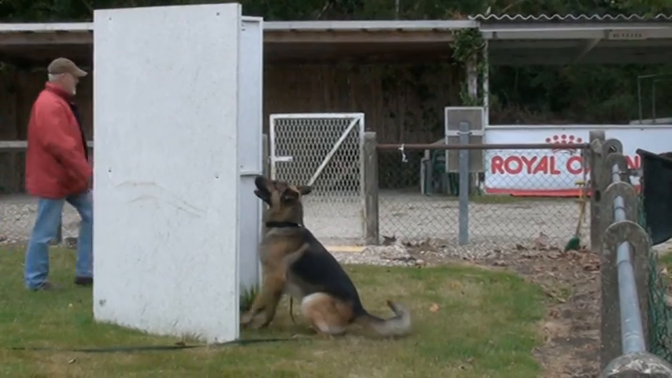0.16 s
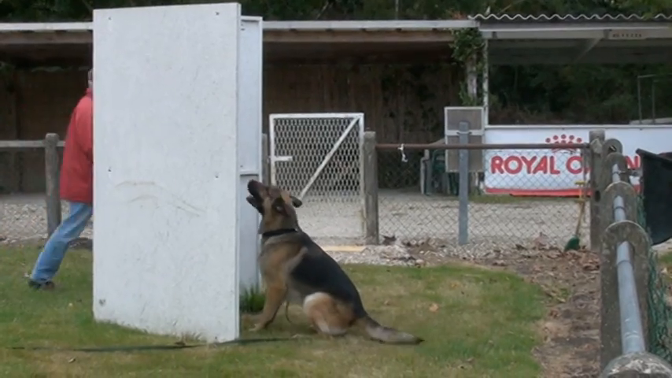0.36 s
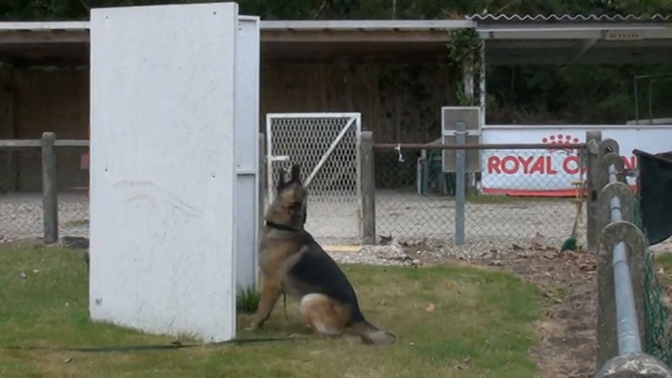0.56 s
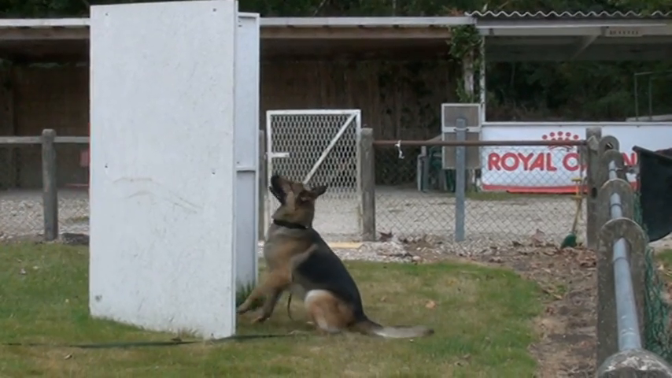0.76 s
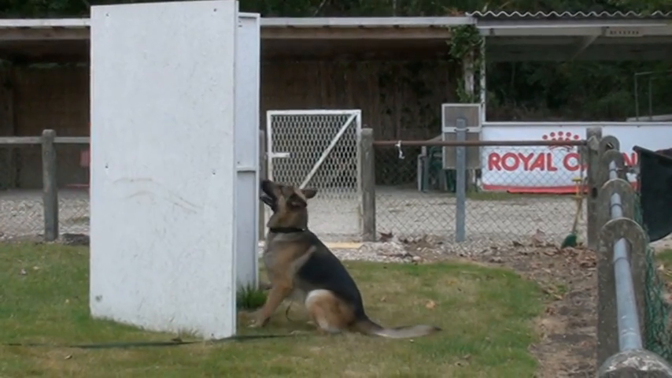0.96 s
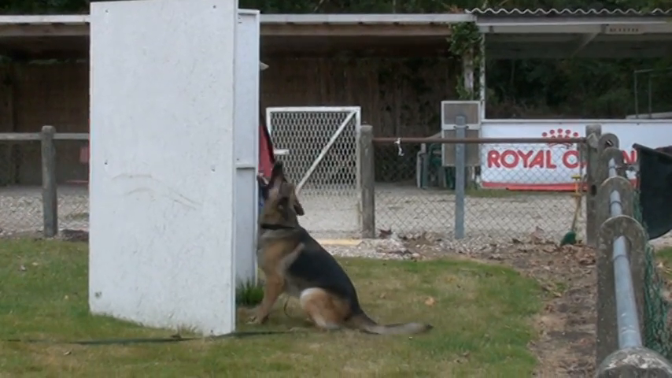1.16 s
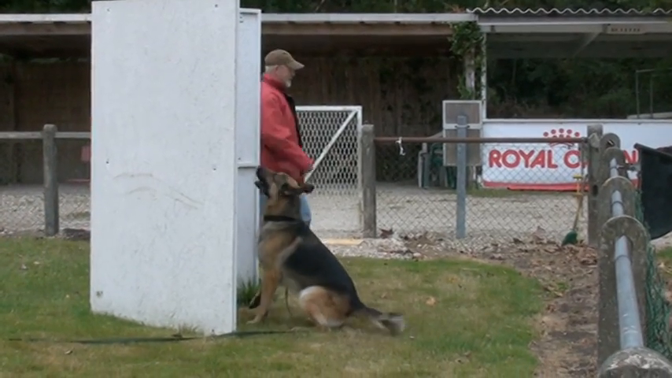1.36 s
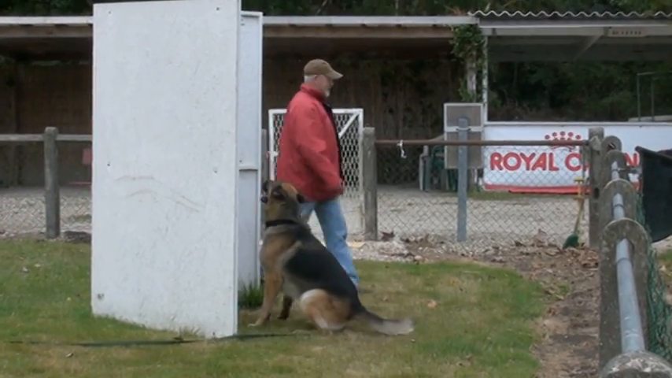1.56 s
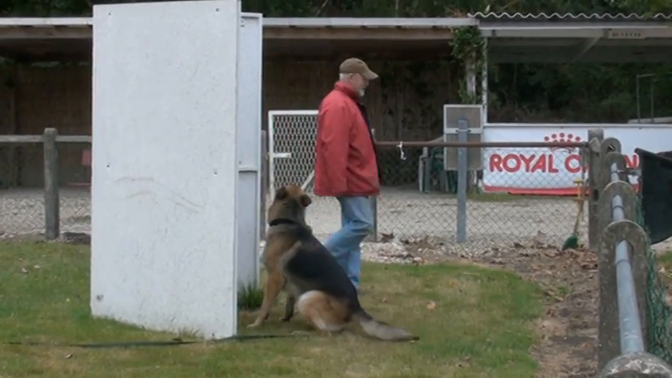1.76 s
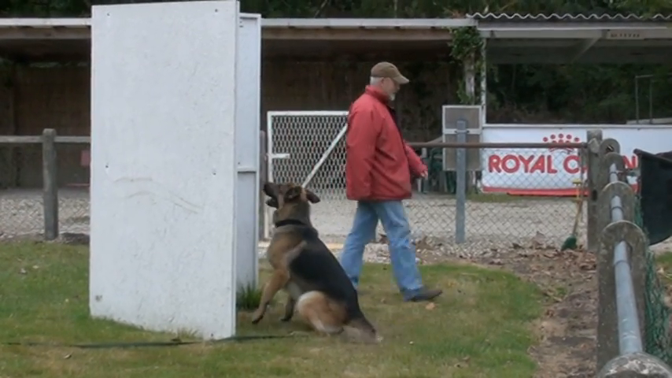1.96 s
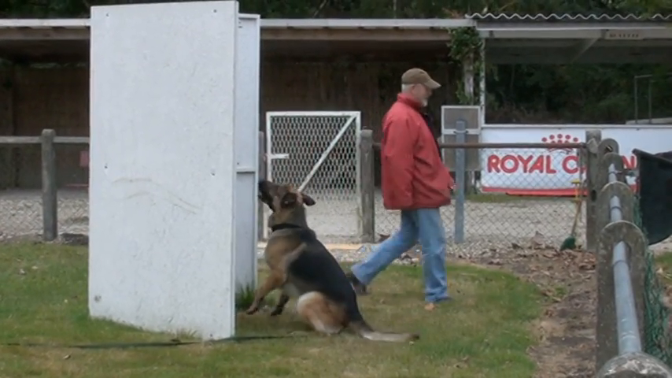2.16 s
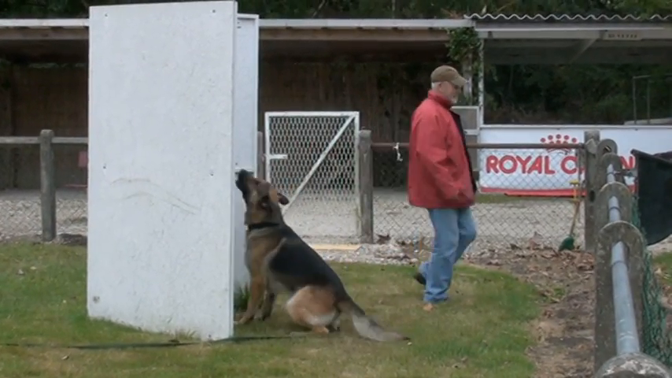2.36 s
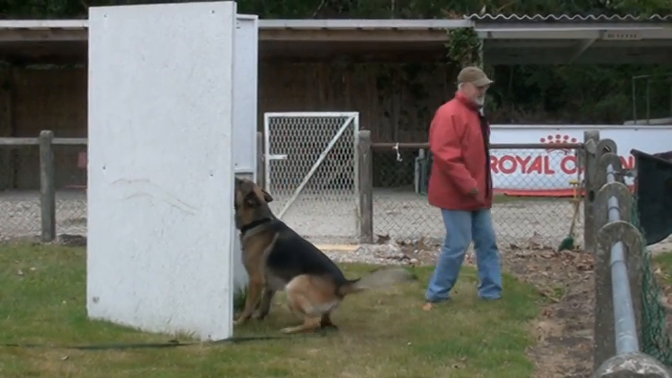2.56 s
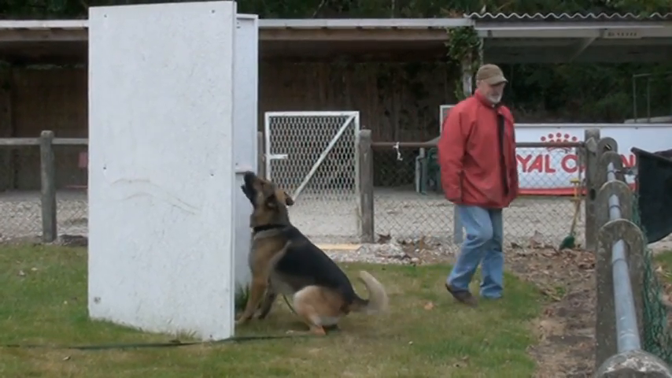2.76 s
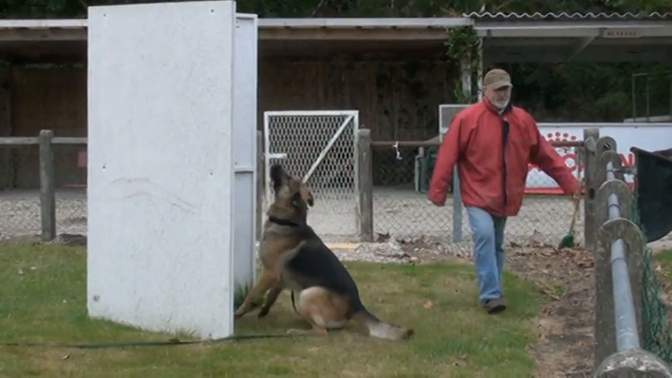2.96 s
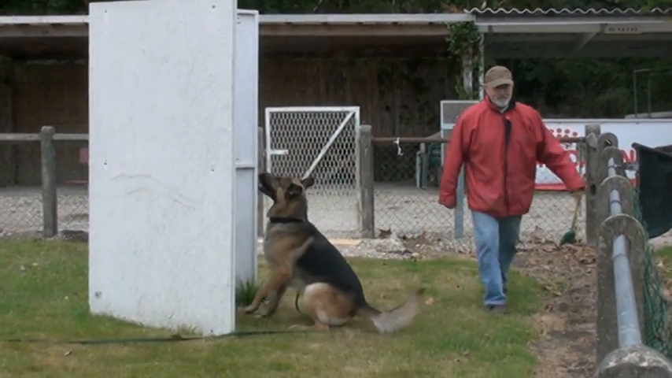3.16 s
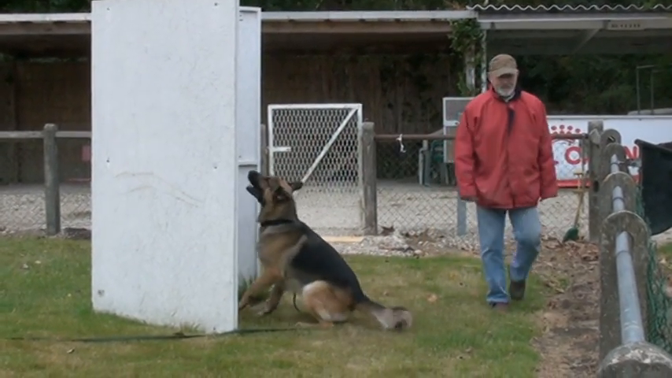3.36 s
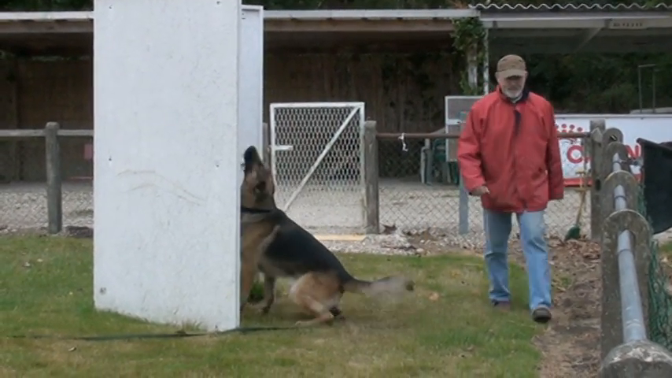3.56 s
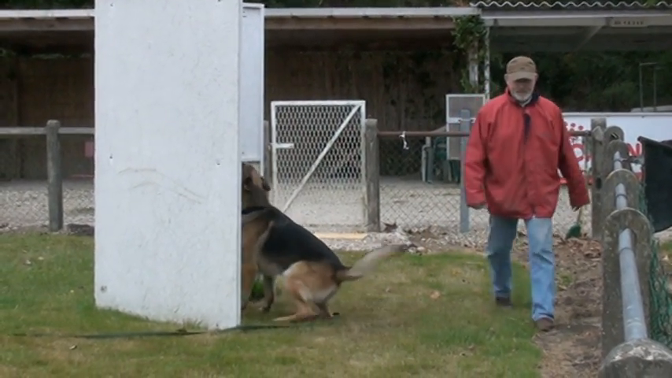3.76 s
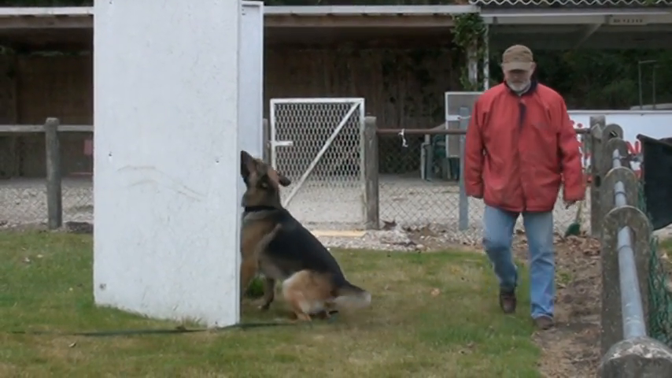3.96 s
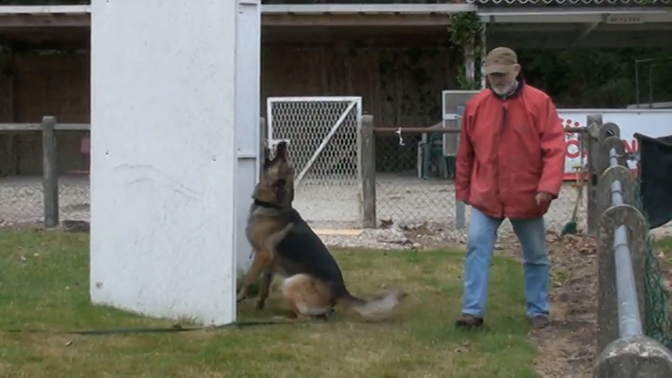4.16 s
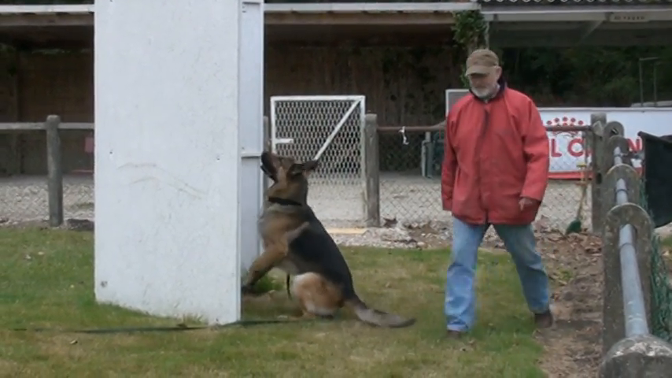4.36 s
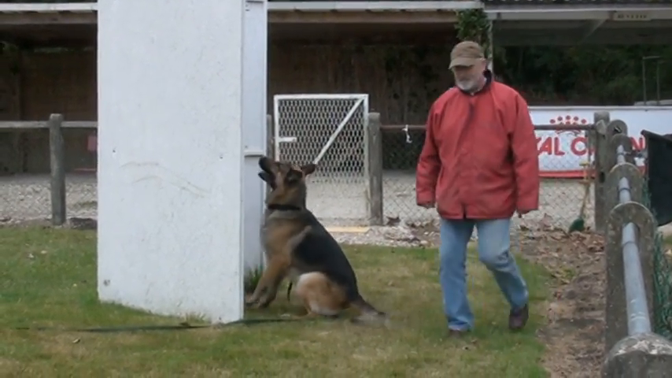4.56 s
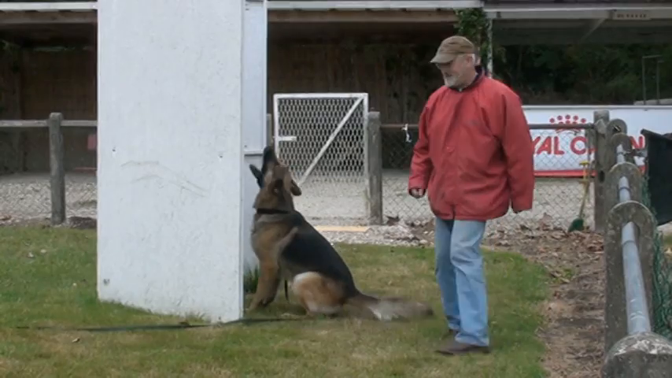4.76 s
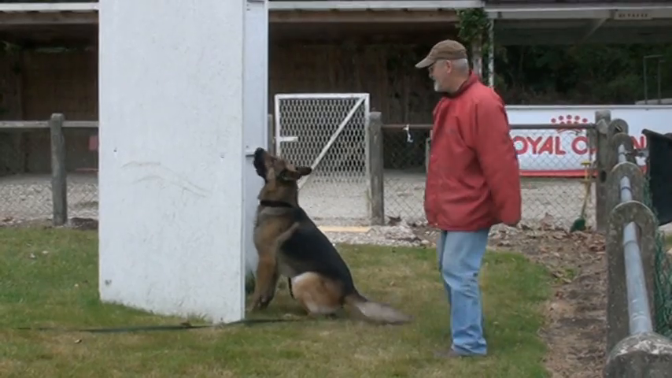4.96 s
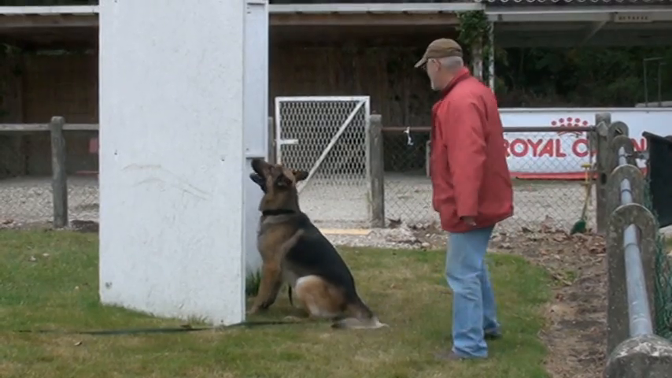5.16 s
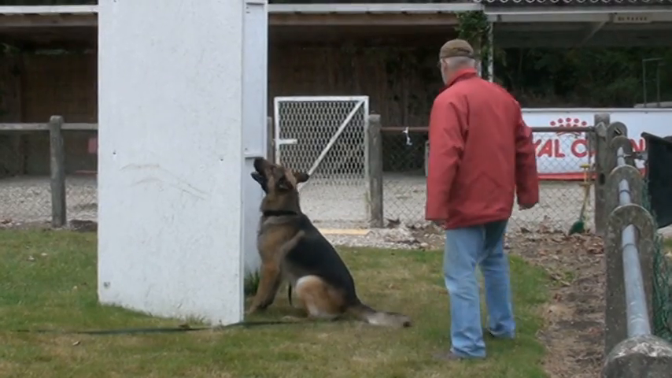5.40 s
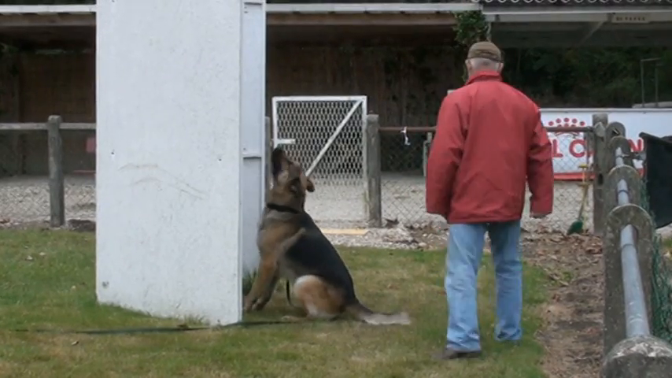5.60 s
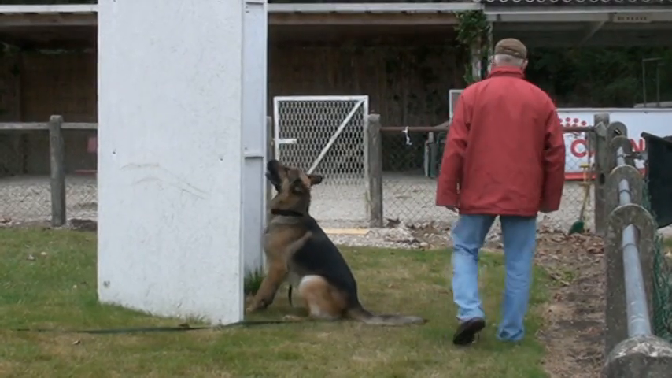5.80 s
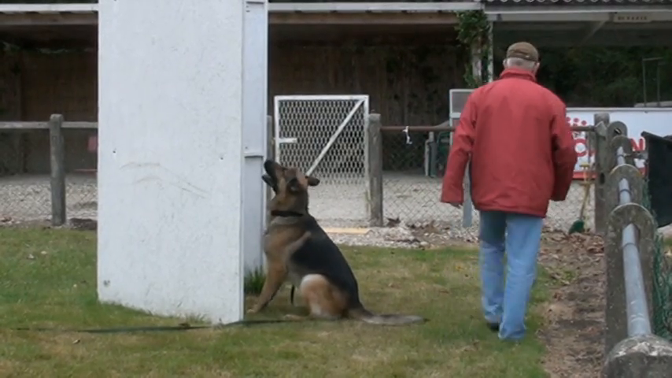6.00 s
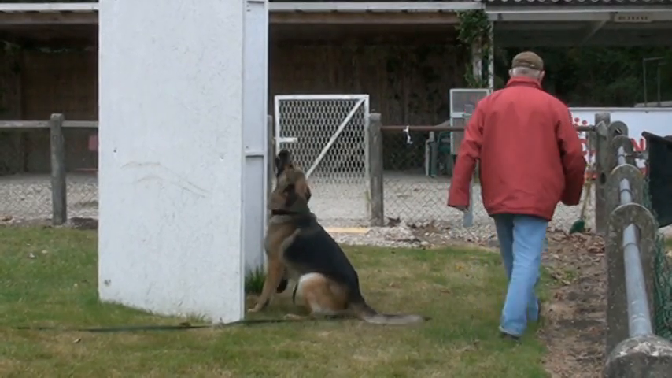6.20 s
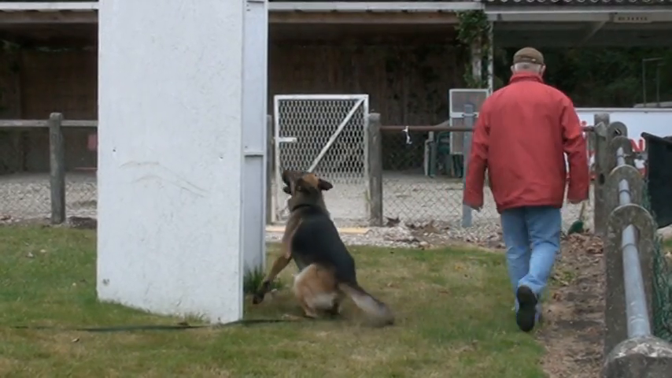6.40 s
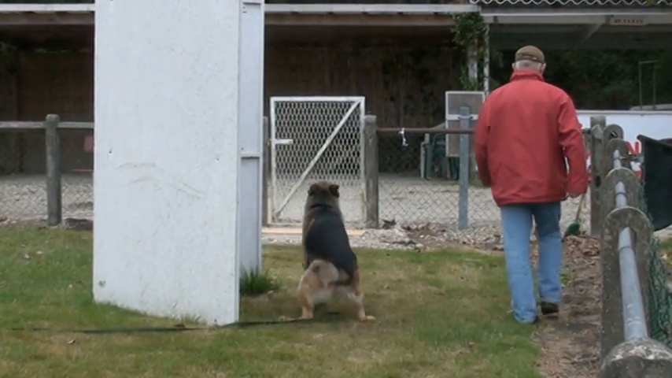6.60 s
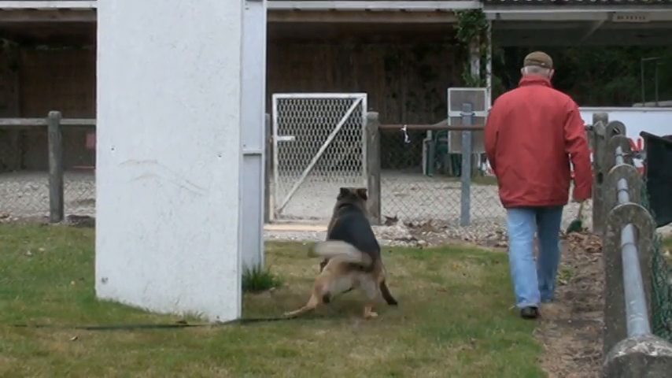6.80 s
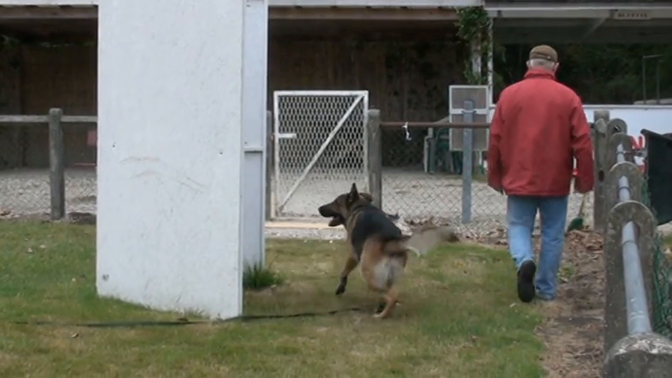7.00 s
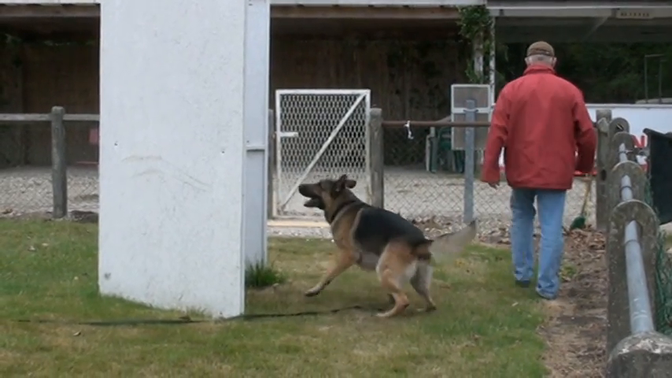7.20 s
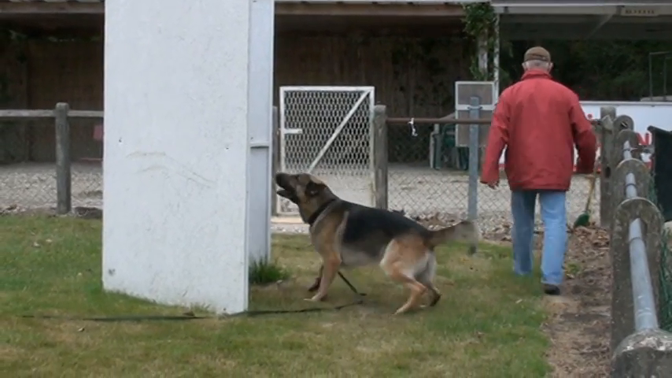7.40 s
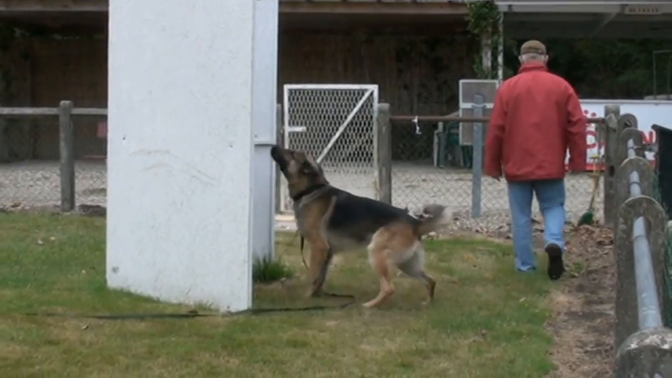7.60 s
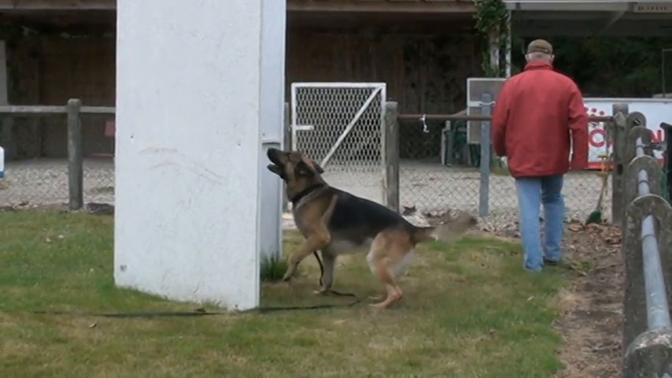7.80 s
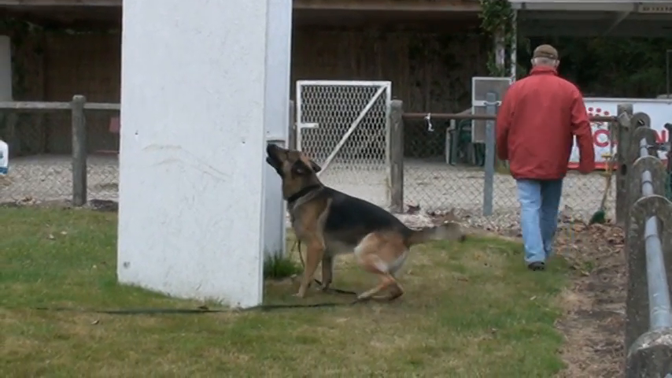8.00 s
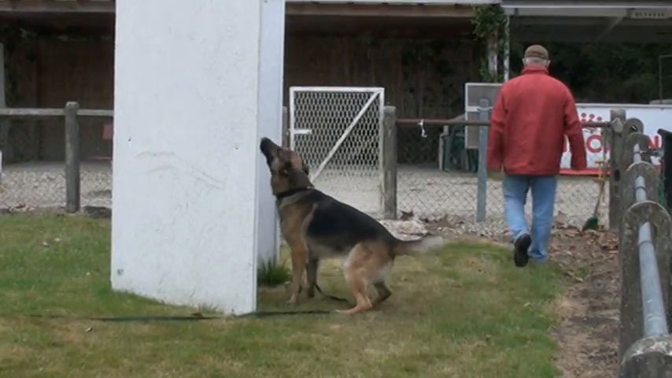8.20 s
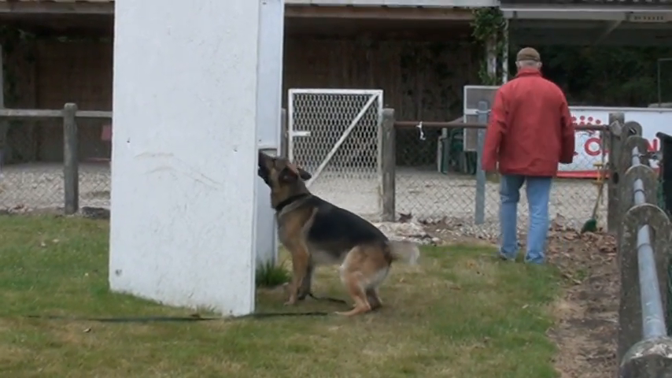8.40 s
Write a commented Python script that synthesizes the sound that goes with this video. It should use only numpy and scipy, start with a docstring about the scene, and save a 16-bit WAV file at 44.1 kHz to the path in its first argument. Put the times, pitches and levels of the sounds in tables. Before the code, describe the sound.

Outdoor field: a big dog barks steadily, short hoarse single barks echoing off nearby sheds, with faint rustles, ticks and a soft far-off traffic wash.

```python
"""On a grass field between sheds, a large dog barks twelve times some metres from a two-port microphone.
Each bark is a stack of vocal-fold partials through jaw, chest, mouth and muzzle resonances, with breath noise.
Sinking notes close the barks; soft puffs are filtered noise. Walls and sheds return echoes and a diffuse tail.
Clicks of noise tick, cloth and grass rustle as swelling hiss, and traffic washes far off.
Below lie steady low air, a far drone and a thin electronic whine."""
import sys
import numpy as np
from scipy import signal
from scipy.fft import rfft, irfft, next_fast_len
from scipy.io import wavfile
from scipy.ndimage import uniform_filter1d, minimum_filter1d

SR = 44100
rng = np.random.default_rng(int(sys.argv[2]) if len(sys.argv) > 2 else 0)


def log_audio(samples):
    """Write samples as a 16-bit WAV file to the path given in sys.argv[1]."""
    # one column per channel
    frames = np.atleast_2d(samples).T
    # limit to full scale, then quantise
    limited = np.clip(frames, -1, 1)
    pcm = np.round(limited * 32767).astype(np.int16)
    wavfile.write(sys.argv[1], SR, pcm)


N = 372644  # length in samples
LEAD = SR // 5  # samples ahead of time zero: the first bark begins there


def gain_of(db):
    """Turns decibels into an amplitude factor."""
    return 10 ** (np.asarray(db) / 20)


def evened(x):
    """Scales a sound to an rms of one, over all its channels together."""
    return x / np.sqrt(np.mean(x ** 2) + 1e-20)


def read(points, hz):
    """Reads a curve of (Hz, value) points along a logarithmic frequency axis."""
    point_hz, value = np.transpose(points)
    return np.interp(np.log(hz + 1), np.log(point_hz + 1), value)


def curve(rows, t):
    """Draws straight lines in time through each column that follows the seconds."""
    seconds, *columns = np.transpose(rows)
    return [np.interp(t, seconds, column) for column in columns]


def add(mix, start_s, sound):
    """Lays a sound into the mix at its start time, cut at the end of the mix."""
    part = mix[round(start_s * SR):][:len(sound)]
    part += sound[:len(part)]


def resonate(x, hz, width_hz):
    """Shifts the curve hz down to zero, smooths twice, and shifts back: a steep resonance."""
    turn = np.exp(2j * np.pi * np.cumsum(hz * np.ones(len(x))) / SR)
    decay = np.exp(-np.pi * width_hz / SR)
    once = signal.lfilter([1 - decay], [1, -decay], x / turn + 1e-18)
    twice = signal.lfilter([1 - decay], [1, -decay], once)
    return 2 * (turn * twice).real


def wobble(length, hz):
    """Low-passes noise at hz, so that it mostly changes more slowly than that."""
    settle = 999  # samples dropped while the filter starts up
    noise = rng.standard_normal(length + settle)
    return evened(signal.lfilter(*signal.butter(2, hz, fs=SR), noise)[settle:])


def hiss(colour_db, patchy_db):
    """Two-channel noise from random short-time spectra; faint patches drift over the colour."""
    # Each row: frequency in Hz, likeness of the left and right port from 0 to 1.
    likeness = [(30, .98), (60, .97), (125, .83), (500, .82), (1500, .73), (4000, .83), (9000, .77),
                (11500, .93), (13500, .99)]
    frames, hz = N // 256 + 5, np.fft.rfftfreq(1024, 1 / SR)
    left_re, left_im, other_re, other_im, patches = rng.standard_normal((frames, 513, 5)).T
    patches = uniform_filter1d(patches, size=12, axis=0)  # across frequency
    patches = evened(uniform_filter1d(patches, size=14, axis=1))  # along time
    same = np.clip(read(likeness, hz), -1, 1)[:, None]
    left = left_re + 1j * left_im
    right = same * left + np.sqrt(1 - same ** 2) * (other_re + 1j * other_im)
    spectra = np.array([left, right])
    spectra *= gain_of(read(colour_db, hz)[:, None] + patchy_db * patches)
    return evened(signal.istft(spectra, nperseg=1024, noverlap=768)[1][:, :N])


def dog():
    """Barks, closing gulps and soft puffs reach the ports directly and by way of the field."""
    # One list a bark. Each row: time in seconds, effort in dB, pitch in Hz, jaw resonance in Hz.
    bark_curves = [
        [(-0.085, -34, 288, 583), (-0.065, -11.5, 285.7, 568.4), (-0.045, -18.5, 347.4, 688),
         (-0.017, -16, 356, 678), (-0.01, -19, 233.3, 470), (0.003, -23.5, 226, 438), (0.015, -19, 214, 424)],
        [(0.57, -33, 348, 700), (0.586, -20.5, 400.6, 806), (0.591, -19, 315, 659), (0.61, -15, 345.7, 649),
         (0.635, -17, 352.2, 702), (0.648, -18.5, 319, 584), (0.66, -21, 232.4, 437), (0.672, -17.5, 212, 426),
         (0.682, -56.5, 210, 420)],
        [(1.178, -50, 283.4, 640), (1.2, -27, 280.6, 600), (1.225, -13.5, 289.4, 596), (1.236, -18, 281, 574),
         (1.244, -18, 351, 705), (1.275, -17.5, 352.7, 707), (1.29, -20.5, 315.7, 516.7),
         (1.306, -27.5, 295, 400)],
        [(2.286, -47, 247.4, 633), (2.295, -25, 248, 706), (2.305, -30.5, 266.7, 709.3),
         (2.312, -15, 304.6, 650), (2.33, -18.5, 327.3, 628), (2.352, -18, 355.5, 610),
         (2.372, -16.5, 340.8, 538), (2.39, -25.5, 333, 480), (2.402, -33, 332, 430)],
        [(2.91, -39, 323.5, 616), (2.93, -26.5, 408.2, 786), (2.936, -19.5, 290.5, 639),
         (2.955, -14.5, 324, 559), (2.97, -15, 345.8, 664), (2.992, -18.5, 338.4, 487),
         (3.003, -16.5, 247.7, 441), (3.022, -33, 229, 410)],
        [(3.567, -50, 300, 628), (3.575, -24.5, 295.8, 620), (3.592, -17, 286.2, 632),
         (3.606, -15.5, 260.2, 533), (3.634, -17, 232.4, 481), (3.642, -32, 206, 447), (3.665, -29, 187, 366)],
        [(4.181, -38.5, 298.6, 609), (4.199, -27, 429.3, 860), (4.204, -17.5, 295, 650),
         (4.218, -17, 296.3, 599), (4.228, -18, 345, 724), (4.256, -17.5, 347.7, 721), (4.263, -17, 233.7, 466),
         (4.276, -19.5, 234, 455), (4.288, -36, 210, 417)],
        [(4.848, -60, 284, 593), (4.858, -28, 285.7, 606), (4.882, -17, 287.6, 606), (4.89, -18.5, 341, 655),
         (4.91, -15.5, 351.5, 666), (4.932, -20.5, 334, 465), (4.942, -32.5, 342, 423), (4.968, -40, 315, 335)],
        [(5.478, -46, 240.7, 570), (5.505, -37, 240.5, 622), (5.518, -24, 259.8, 624), (5.535, -29, 293.6, 618),
         (5.543, -15.5, 336, 624), (5.58, -17.5, 363.6, 722), (5.6, -18, 350, 702), (5.622, -21.5, 308.3, 530),
         (5.644, -40, 274, 584)],
        [(6.108, -47, 292.8, 686), (6.14, -38.5, 279.3, 693), (6.158, -27.5, 289.7, 702),
         (6.178, -16, 299.4, 628), (6.193, -20.5, 317, 626), (6.203, -15.5, 357.4, 733),
         (6.222, -18.5, 362.4, 736), (6.242, -19, 347.4, 690), (6.262, -18, 290.5, 538), (6.286, -51, 246, 500)],
        [(7.524, -45, 334, 485), (7.538, -22.5, 340.6, 706), (7.55, -18, 294.4, 688), (7.575, -16.5, 341, 653),
         (7.605, -17, 352, 717), (7.628, -21.5, 319.3, 528), (7.642, -37, 310, 630)],
        [(8.112, -58, 244.3, 595), (8.129, -36, 238.4, 584), (8.136, -24.5, 249, 530), (8.15, -29, 283, 545),
         (8.162, -19, 334.4, 630), (8.18, -15, 350, 647), (8.195, -16, 365.5, 700), (8.213, -22, 370.4, 694),
         (8.235, -21, 348, 640), (8.248, -22, 330, 540), (8.26, -49.5, 318, 606)],
    ]
    # Each row, one a bark: starting roughness at full effort from 0 to 1, mouth resonance in dB at start
    # and at end, muzzle brightness in dB at start and at end (mouth and muzzle for a jaw at rest, muzzle
    # at full effort), chest resonance in dB at the end, rasp of air in dB halfway at full effort,
    # closing tone in dB, gulp in dB.
    bark_timbres = [(0.12, 1.5, 4, -2, -3.5, 0.5, 7, -4, -41.5),
                    (0.2, -2, 7.5, -8, -4.5, -13, -1, -0.5, -42.5),
                    (0.07, -0.5, 3.5, -3, -3.5, -6.5, 4, -13, -43),
                    (0.09, -4, 4, -10.5, -8, -6.5, 2, -9.5, -47),
                    (0.16, -8, 12.5, -8.5, -4, -13, 0.5, 1.5, -50),
                    (.08, 2.5, -11, -9, -10.5, 1.5, 4, -6, -43.5),
                    (0.18, -4.5, 3.5, -9.5, -3, -8.5, 3.5, 0, -41),
                    (.12, -0.5, 5.5, -5, -8, -4.5, 3.5, -12.5, -43),
                    (0.18, -3.5, -3, -13, -5, -12.5, 1.5, -11, -50),
                    (0.06, -6.5, 2.5, -5.5, -8.5, -10, 1, -16, -55),
                    (0.12, 2, -2, -18.5, -3.5, -1.5, 3.5, -11, -53),
                    (0.14, 6, -0.5, -4.5, -8, 5.5, 2, -20, -53)]
    mix, lead_s = np.zeros(next_fast_len(N + LEAD)), LEAD / SR
    for rows, (*timbre, gulp_db) in zip(bark_curves, bark_timbres):
        start_s, end_s = rows[0][0], rows[-1][0]
        add(mix, start_s + lead_s, bark(rows, *timbre))
        add(mix, end_s - .012 + lead_s, gulp(gulp_db))
    soft_puffs(mix)
    return (ports(mix) + field(mix))[:, LEAD:LEAD + N]


def bark(rows, rough, mouth_db, mouth_end_db, bright_db, bright_end_db, chest_db, rasp_db, tone_db):
    """Vocal-fold partials, shaken by chance as roughness grows, pass jaw, chest, mouth and muzzle."""
    # A broad and a sharp part of the jaw resonance. Each row: smoothing width in Hz, level in dB.
    jaw_parts = [(278, -4.5), (108.5, -3.5)]
    # Muzzle resonances. Each row: frequency in Hz, smoothing width in Hz, relative level in dB.
    muzzle_modes = [(1468, 332, -2), (1802, 300, -4.5), (2026, 550, -17.5), (2540, 620, -26.5)]
    # Air past the teeth. Each row: frequency in Hz, smoothing width in Hz, relative level in dB.
    breath_bands = [(3130, 1670, -43), (4380, 2440, -39), (5770, 1700, -41), (7550, 2000, -47),
                    (9700, 3900, -49.5)]
    jaw_rest_hz, shut_hz = 658, 151  # shut_hz: sink below rest at which the closing tone is full
    t = np.arange(rows[0][0], rows[-1][0], 1 / SR)
    effort_db, hz, jaw_hz = curve(rows, t)
    done = np.linspace(0, 1, len(t))
    weak_db = np.maximum(-16 - effort_db, 0)  # how far below full effort
    open_hz = jaw_hz - jaw_rest_hz

    # weak and tiring folds vibrate unevenly
    rough = np.clip(rough + .018 * weak_db + .22 * done ** 4.0, 0, 1)
    # a wide jaw rings brighter; a weak push dulls the muzzle
    mouth_db = mouth_db + (mouth_end_db - mouth_db) * done + .03 * open_hz
    bright_db = bright_db + (bright_end_db - bright_db) * done + .02 * open_hz - 0.35 * weak_db
    # chest and rasp grow through each bark
    chest_db = chest_db - 21.5 * (1 - done)
    rasp_db = rasp_db - 8.5 * (.5 - done)

    turns = np.cumsum(hz * (1 + 0.054 * rough * wobble(len(t), 91))) / SR
    shared, drive = wobble(len(t), 210), 0
    for k in range(1, 10):
        shake = 0.23 * shared + 1.39 * wobble(len(t), 206)  # uneven cycles fill the gaps between the lines
        spread = 0.348 * k * k  # a drawn-out closing of the folds staggers the partials
        broken = np.clip(rough * (0.72 + 0.089 * k), 0, .98)  # high partials break up first
        strength = np.sqrt(1 - broken ** 2) + 1.84 * broken * shake
        drive = drive + strength * np.cos(2 * np.pi * k * turns - spread)

    voice = sum(gain_of(db) * resonate(drive, jaw_hz, width) for width, db in jaw_parts)
    voice -= gain_of(chest_db) * resonate(drive, hz=317.3, width_hz=67)
    mouth_hz = 1000 + 0.11 * open_hz  # sinks as the jaw closes
    voice -= gain_of(mouth_db) * resonate(drive, mouth_hz, width_hz=238)
    muzzle = 0
    for k, (mode_hz, width, db) in enumerate(muzzle_modes):
        muzzle = muzzle + (-1) ** k * gain_of(db) * resonate(drive, mode_hz, width)
    voice += gain_of(bright_db) * muzzle

    # the jaw sings a tone of its own as it sinks
    shut = done * np.clip(-open_hz / shut_hz, 0, 1) ** 2
    tone_turns = np.cumsum(jaw_hz * (1 + 0.021 * wobble(len(t), 60))) / SR
    voice += gain_of(tone_db) * shut * np.sin(2 * np.pi * tone_turns)
    # the head is too small to send out bass
    voice = signal.sosfilt(signal.butter(4, 270, "high", fs=SR, output="sos"), voice)
    # level the voice, so that effort alone sets its loudness
    power = uniform_filter1d(uniform_filter1d(voice ** 2, size=500), size=500)
    voice /= np.sqrt(power + 1e-9)

    puffs = (0.36 + np.exp(-(turns % 1) / 0.18)) * rng.standard_normal(len(t))  # air escapes once a cycle
    air = 0
    for band_hz, width, db in breath_bands:
        flutter_db = 3.16 * wobble(len(t), 34)
        air = air + gain_of(db + flutter_db) * evened(resonate(puffs, band_hz, width))
    air = signal.lfilter(*signal.butter(2, 11500, fs=SR), air)
    air *= gain_of(rasp_db - 0.17 * weak_db)  # turbulence grows faster than the voice
    return (voice + air) * gain_of(effort_db) * signal.windows.tukey(len(t), .1)


def gulp(db):
    """A short low note that sinks as the throat shuts."""
    from_hz, to_hz, length_s = 309.5, 202, 0.0552  # pitches before the chance shift
    hz = np.linspace(from_hz, to_hz, round(length_s * SR)) * rng.uniform(0.91, 1.113)
    note = np.sin(2 * np.pi * np.cumsum(hz) / SR)
    return gain_of(db + 3.2 * wobble(len(hz), 40)) * note * np.hanning(len(hz))


def soft_puffs(mix):
    """Soft pants, and one faint high burst, perhaps a collar chain: noise through one slowly rising resonance."""
    # Each row: middle in seconds, level in dB before the swell, nominal pitch in Hz, length in seconds,
    # smoothing width in Hz.
    puff_rows = [(1.836, -51.5, 890, 0.21, 406), (4.319, -55.5, 4800, 0.098, 2200),
                 (6.706, -50, 1020, 0.14, 110), (7.115, -50.5, 1110, .14, 260)]
    rising = np.linspace(.95, 1.2, SR // 4)
    for middle_s, db, hz, length_s, width in puff_rows:
        noise = evened(resonate(rng.standard_normal(SR // 4), hz * rising, width))
        puff = noise[:round(length_s * SR)]
        add(mix, middle_s - length_s / 2 + LEAD / SR, gain_of(db) * puff * np.hanning(len(puff)))


def ports(x):
    """The two microphone ports hear the dog with a small difference in level and phase."""
    # Each row: frequency in Hz, left minus right level in dB.
    lean_db = [(200, -1), (400, -2.5), (700, 1.5), (1200, 0), (3000, 0.3), (9000, 1)]
    # Each row: frequency in Hz, lead of the left port in radians.
    lead_rad = [(200, 0.38), (520, 0.51), (1200, 0.035), (2000, 0.31), (4000, 0.15)]
    hz = np.fft.rfftfreq(len(x), 1 / SR)
    half = gain_of(read(lean_db, hz) / 2) * np.exp(.5j * read(lead_rad, hz))
    return irfft(rfft(x) * np.array([half, 1 / half]), len(x))


def field(x):
    """Wall echoes, duller than the voice, and a diffuse tail whose bands die at their own speeds."""
    # Wall echoes before dulling. Each row: delay in seconds, left level in dB, right level in dB.
    wall_echoes = [(.0054, -23.5, -19), (.0138, -14, -13.5), (.027, -22.5, -15), (.066, -23, -20),
                   (0.095, -31, -22.5), (.125, -33.5, -39.5), (.37, -44, -39.5)]
    # Diffuse tail. Each row: frequency in Hz, time in seconds to fall by 60 dB.
    decay_times = [(250, 1.83), (600, 0.84), (1100, 1.29), (1800, 1.2), (3000, 1.5), (8000, 0.99)]
    # Resonances that ring at fixed pitches in the late echoes. Each row: frequency in Hz, smoothing width in
    # Hz, level in dB.
    ring_modes = [(574, 65, 1), (1060, 40, -8), (1444, 190, -3)]
    taps = np.zeros((2, SR))
    at = np.arange(900, SR - 20, 20) + rng.integers(0, 20, (2, (SR - 901) // 20))
    np.put_along_axis(taps, at, rng.choice([-1., 1.], at.shape), 1)
    taps[1] = 0.96 * taps[0] + 0.94 * taps[1]  # the ports share part of the tail
    hz, t, spectra = signal.stft(taps, SR, nperseg=256)
    fall_db = -60 * t / read(decay_times, hz)[:, None]
    response = signal.istft(spectra * gain_of(fall_db), SR, nperseg=256)[1][:, :SR]
    response *= gain_of(-23.5) / np.linalg.norm(response[0])  # tail level before walls, ringing and dulling
    for delay_s, *db in wall_echoes:
        response[:, round(delay_s * SR)] += gain_of(db)
    late = response * (np.arange(SR) > .02 * SR)
    for mode_hz, width, db in ring_modes:
        response += gain_of(db) * np.array([resonate(side, mode_hz, width) for side in late])
    response = signal.lfilter(*signal.butter(1, 3500, fs=SR), response)
    return signal.fftconvolve(x[None], response, axes=1)[:, :len(x)]


def ticks():
    """Small hard contacts: a few milliseconds of bright noise."""
    # Each row: start in seconds, peak in dB, frequency in Hz.
    tick_rows = [(0.66, -33, 4250), (4.5294, -52, 4030), (5.0494, -49, 5280), (5.6394, -49, 5180),
                 (6.5884, -45, 5880), (6.9174, -44, 4000), (7.06, -50, 6240), (7.1494, -46, 6100),
                 (7.5554, -40, 4160), (7.643, -33, 4160), (7.7577, -44, 6070)]
    x, t = np.zeros(N), np.arange(300) / SR
    for start_s, db, hz in tick_rows:
        burst = rng.standard_normal(300) * np.exp(-t / 0.0012)
        snap = resonate(burst, hz, width_hz=3500)
        add(x, start_s, gain_of(db) * snap / abs(snap).max())
    return x


def rustling(t):
    """Each movement of cloth or feet swells and fades over a faint steady rustle."""
    # Cloth and grass. Each row: middle in seconds, level in dB, length in seconds.
    movements = [(1.955, -73, 1), (3.464, -63.5, 0.23), (4.3, -71, .4), (4.8, -70, 0.38),
                 (5.897, -64, 0.46), (6.447, -70, 0.2), (7.207, -65, 0.77), (7.797, -71, 0.6),
                 (8.3, -66.5, 0.64)]
    # Each row: frequency in Hz, relative level in dB.
    rustle_colour = [(2000, 4), (5000, 14), (9000, 10.5), (12000, 6.5), (16000, -12)]
    level = gain_of(-79)  # the steady rustle
    for middle_s, db, length_s in movements:
        swell = np.cos(np.pi * np.clip((t - middle_s) / length_s, -.5, .5)) ** 2
        level = level + gain_of(db) * swell
    return level * gain_of(2.1 * wobble(N, 40)) * hiss(rustle_colour, patchy_db=2)


def traffic(t):
    """Far traffic: a broad wash of coloured noise whose level drifts."""
    # Each row: time in seconds, level of the wash in dB.
    wash_level = [(0.0, -47.5), (0.73, -49), (3.7, -52), (5.6, -51), (6.66, -51.5), (7.48, -51),
                  (7.88, -52), (8.45, -49.5)]
    # Each row: frequency in Hz, relative level in dB per Hz.
    wash_colour = [(20, -45.5), (60, -23), (110, -14.5), (200, -3), (400, -3.5), (650, -2), (1050, -1),
                   (2000, -7.5), (4000, -12.5), (6300, -16.5), (8000, -21.5), (10000, -28), (13000, -34.5),
                   (16400, -38.5)]
    return gain_of(curve(wash_level, t)[0]) * hiss(wash_colour, patchy_db=0.42)


def low_air():
    """Steady low air: noise that thins out quickly above the bass."""
    # Each row: frequency in Hz, relative level in dB per Hz.
    low_colour = [(20, -14), (45, -4.5), (68, 0.5), (130, -5), (220, -9), (500, -39.5), (900, -85)]
    return gain_of(-59) * hiss(low_colour, patchy_db=0.55)


def far_drone(t):
    """A far drone: nearly flat noise narrowed to a low hum, coming and going."""
    # Each row: time in seconds, level in dB.
    drone_level = [(0.0, -69), (0.8, -75), (2.2, -62), (3.4, -56), (3.8, -65), (6.1, -62.5), (6.6, -78),
                   (8.0, -62), (8.45, -68)]
    noise = hiss([(20, 0.0037), (400, 0)], patchy_db=0)
    hum = np.array([resonate(side, hz=107, width_hz=28) for side in noise])
    return gain_of(curve(drone_level, t)[0]) * evened(hum)


def electronic_whine(t):
    """Camera electronics: a thin, very high sine with a slight flutter in level."""
    hz, rms_db = 15625, -89  # level before the flutter
    return gain_of(rms_db + 1.5 * wobble(N, 30)) * evened(np.sin(2 * np.pi * hz * t))


def scene():
    """Sums the dog, the small sounds near the microphone and the far background."""
    t = np.arange(N) / SR
    near = dog() + ticks() + rustling(t)
    background = traffic(t) + low_air() + far_drone(t) + electronic_whine(t)
    return near + background


def record(dry):
    """A quick limiter turns both channels down around the highest peaks; then the band limit."""
    ceiling, edge_hz = .385, 16500  # ceiling: the highest peak the limiter aims for
    allowed = np.minimum(1, ceiling / (abs(dry).max(axis=0) + 1e-9))
    held = uniform_filter1d(minimum_filter1d(allowed, size=301), size=301)
    low_pass = signal.firwin(511, edge_hz, window=("kaiser", 9), fs=SR)
    return signal.oaconvolve(dry * held, low_pass[None], "same")


dry = scene()
out = record(dry)
log_audio(out)
```